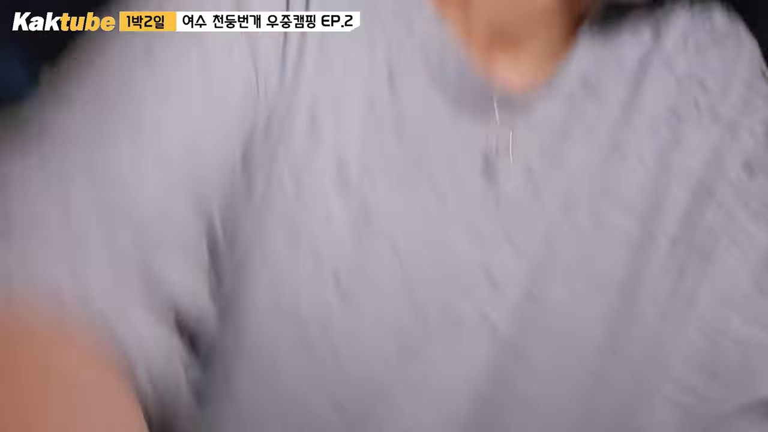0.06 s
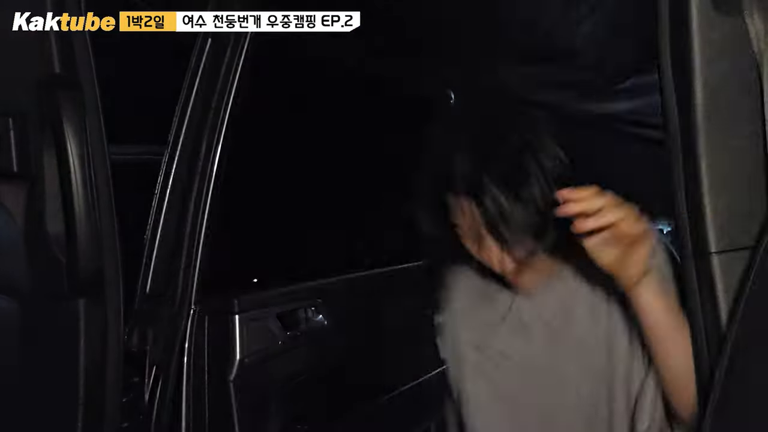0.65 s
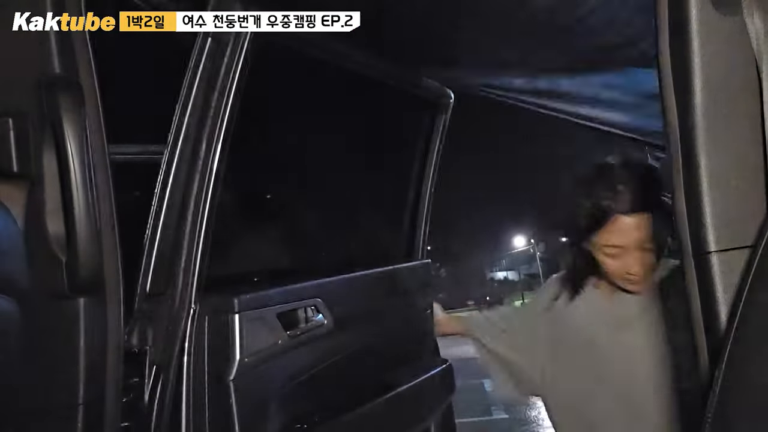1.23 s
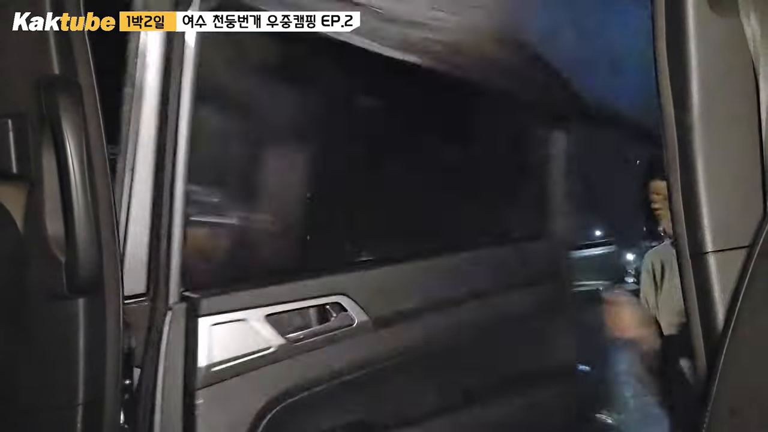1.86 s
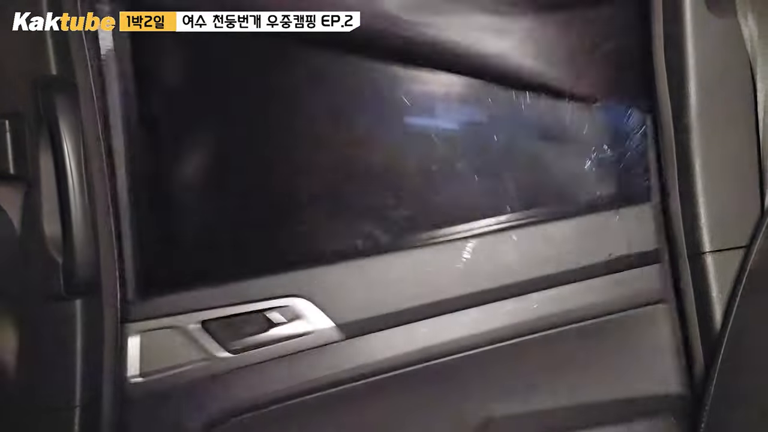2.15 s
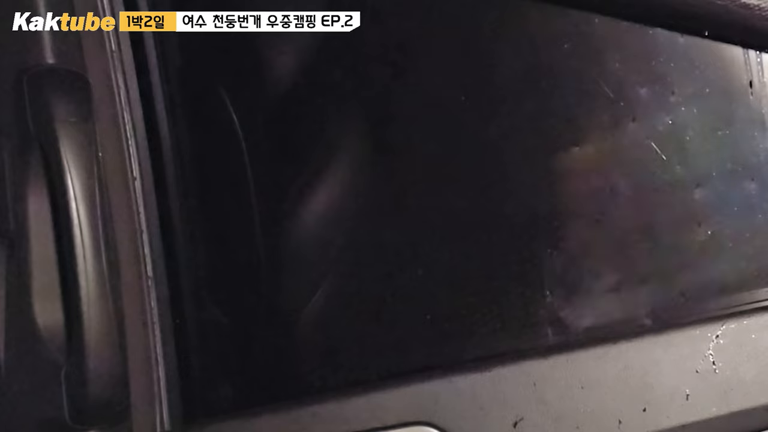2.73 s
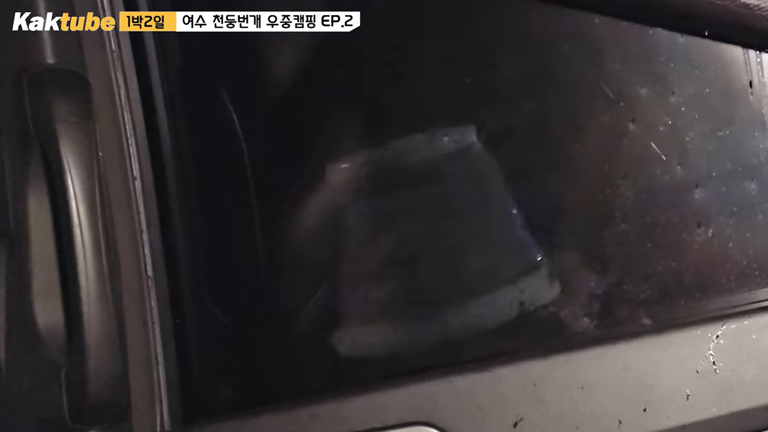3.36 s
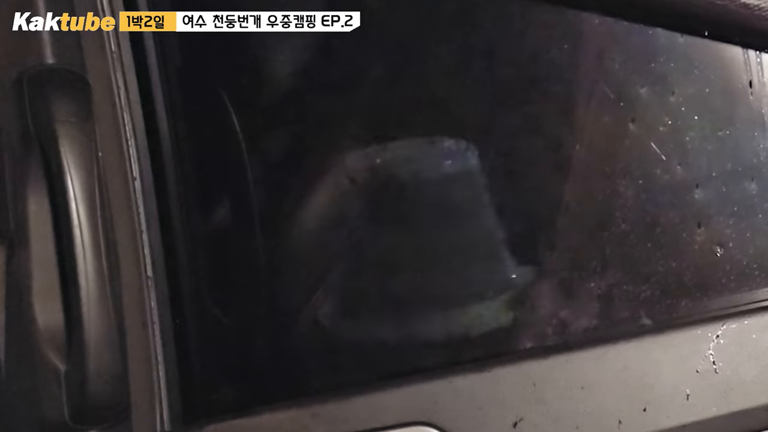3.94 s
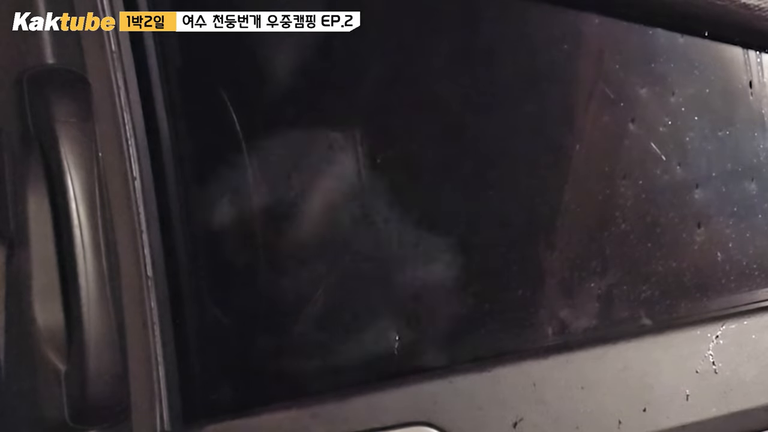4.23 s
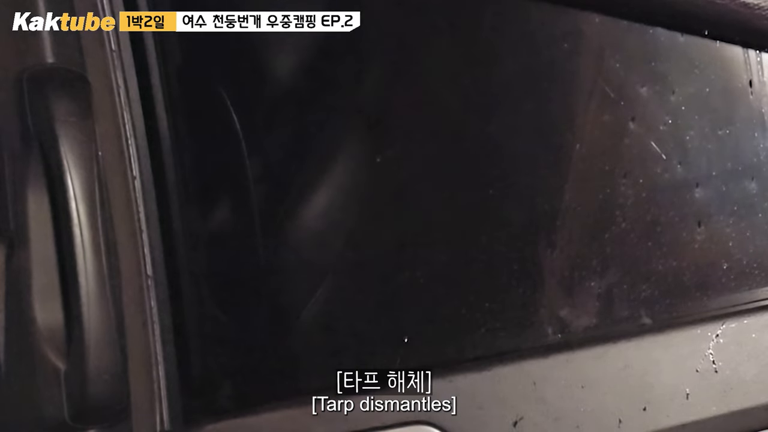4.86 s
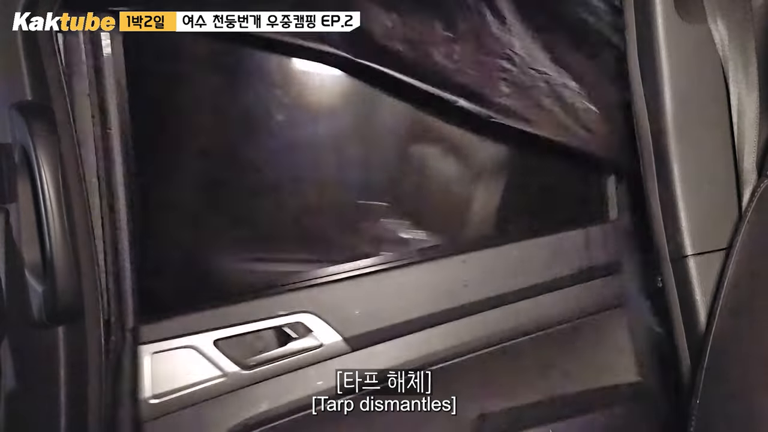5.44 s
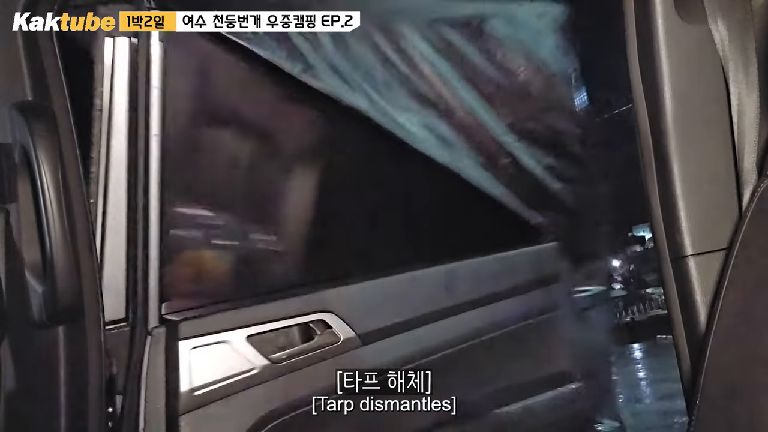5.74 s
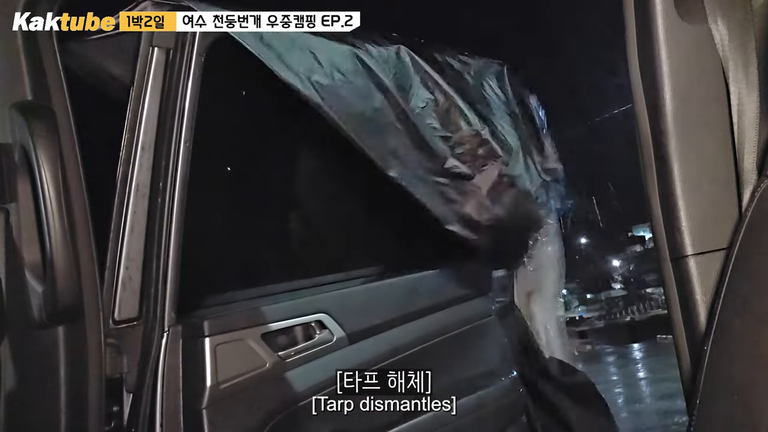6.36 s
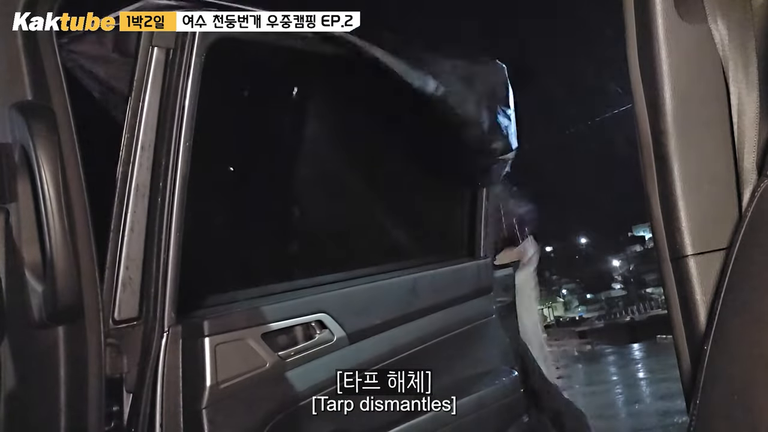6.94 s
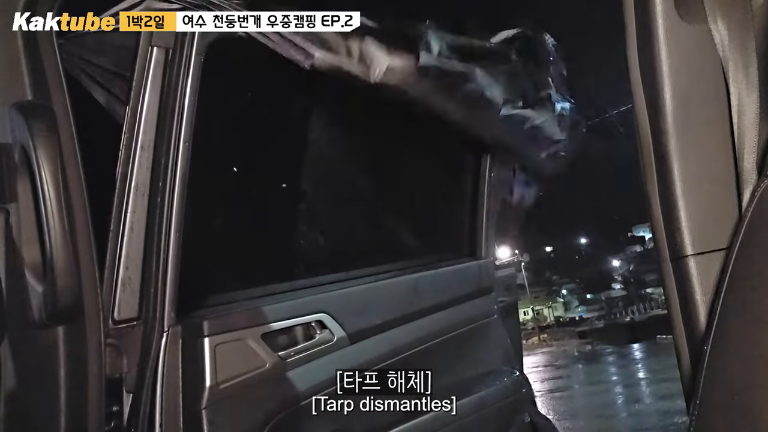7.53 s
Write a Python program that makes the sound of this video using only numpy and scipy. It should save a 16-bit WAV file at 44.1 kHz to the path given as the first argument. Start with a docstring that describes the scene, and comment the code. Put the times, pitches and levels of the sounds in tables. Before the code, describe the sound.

Heard from a car's back seat, rain patters on a tarp by the open door and drums dully on the roof. A hand knocks against the microphone, and fat drips fall nearby. The door slams with a deep boom and the rain turns muffled. Something thuds against the car, then the door clunks open and the wet tarp is dragged off, swishing, crumpling and snapping over faint rain.

```python
"""Night rain patters on a tarp by a parked car's open door and drums on the roof, heard from the back
seat. A hand knocks the camera into place, ringing its mount. The door slams: panel and latch ring, the
cabin air booms and the rain turns dull. Something thuds against the car. The door is unlatched again
and the wet tarp is dragged off it, swishing, crumpling and snapping at its folds."""
import sys
import numpy as np
from scipy import signal
from scipy.fft import rfft, irfft, next_fast_len
from scipy.io import wavfile
from scipy.ndimage import map_coordinates

SR = 44100
rng = np.random.default_rng(int(sys.argv[2]) if len(sys.argv) > 2 else 0)


def transcribe(u):
    """Save the signal u as a 16-bit wav file named by the first command-line argument.

    u: samples, shape (n,) or (channels, n), limited to [-1, 1]; the rate is SR.
    q: integer samples, one column per channel.
    """
    v = np.clip(np.atleast_2d(u).T, -1, 1)
    q = np.round(v * 32767).astype(np.int16)
    wavfile.write(sys.argv[1], SR, q)


N = 334719

# rain at the back seat before the slam (time [s], level [dB])
RAIN_FADER = [(0, -37.5), (.3, -38.5), (.46, -48.5), (.6, -34), (.78, -32), (1.45, -37), (1.8, -36),
              (2.2, -40)]
# roof drumming and body rumble (time [s], roof level [dB], rumble level [dB])
BODY_FADERS = [(0, -33.5, -38.5), (.6, -38, -42), (1.1, -44.5, -41), (1.39, -38, -33), (1.58, -50.5, -48),
               (2.2, -39.5, -38), (2.85, -46.5, -48), (3.6, -54, -46), (4.42, -50.5, -39.5),
               (5.45, -52, -48), (6.25, -44.5, -49.5), (7.59, -51.5, -54.5)]
# the car rocking as someone moves about it (time [s], level [dB], pitch [Hz], t60 [s])
ROCKING = [(0.16, -19.5, 64, 0.26), (.27, -18, 73.5, 0.48), (0.824, -13.5, 46.8, 0.21),
           (1.429, -25, 43, 0.65), (2.149, -14.5, 63.3, 0.13), (3.104, -29, 57.3, 1),
           (4.791, -23.5, 42.7, .3), (5.015, -23, 63, 0.77), (5.696, -28.5, 57.4, 0.44),
           (6.28, -28, 40.8, 0.36)]
# knocks on the camera (time [s], ring level [dB], click level [dB], click tilt [dB/octave])
CAMERA_KNOCKS = [(.162, -5, -17.5, 3), (0.2525, -15.5, -12.5, -1), (.298, -16.5, -20.5, -4),
                 (.319, -3.5, -12, 1.5), (0.3291, -6.5, -6.5, -2), (.353, -13, -25, -6),
                 (.386, -14.5, -25, -7.5), (0.4366, -17.5, -15, -0.5), (0.483, -20, -31, 0),
                 (0.54, -36, -24.5, 2.5)]
# grip and rubber seals rubbing (start [s], end [s], final level [dB], pitch [Hz])
RUBBER_RUBS = [(0.209, 0.252, -34.5, 600), (0.266, 0.331, -25.5, 526), (2.194, 2.223, -26.5, 596),
               (3.241, 3.318, -43.5, 495), (4.949, 5.09, -40, 314)]
# small hard things clinking (time [s], level [dB], pitch [Hz], t60 [s])
HARD_CLINKS = [(0.4378, -13.5, 3080, 0.0087), (4.489, -59, 1640, 0.2), (4.49, -47, 2270, 0.061)]
# door hits (time [s], panel [dB], trim [dB], latch [dB], crack t60 [s], crack tilt [dB/octave])
DOOR_HITS = [(2.169, -28, -52, -34, 0.039, -0.5), (2.2166, -10, -41, -19, 0.032, -1),
             (2.22, -20, -43, -6, 0.056, -3), (2.241, -28.5, -22, -20.5, 0.085, 5),
             (2.257, -34.5, -30.5, -18.5, 0.075, 3.5), (2.281, -36, -27, -37.5, 0.35, 4.5),
             (3.309, -10, -13.5, -45, 0.24, -1.5), (3.341, -11, -29, -36, 0.11, -2.5),
             (3.966, -30, -35, -62, .09, -8), (4.958, -38.5, -42, -39.5, 0.0087, 0.5),
             (5.0696, 0.5, -28, -34.5, 0.13, -4), (5.106, -21, -24, -36, .06, -5)]
# jolts that pump the cabin air (time [s], level [dB], pitch [Hz], bodywork shudder [dB])
JOLTS = [(2.29, 3, 67.6, -31.5), (2.455, -1.5, 40.2, -43.5), (3.317, 4.5, 53.5, -34.5),
         (5.067, -0.5, 74, -27)]
# pulls on the tarp (middle [s], length [s], swish level [dB], crumple level [dB])
TARP_PULLS = [(5.6, 0.45, -50, -52), (5.995, 0.14, -55, -49.5), (6.249, 0.13, -47.5, -44),
              (6.459, 0.099, -43.5, -41), (6.59, .055, -47, -38), (6.635, 0.046, -45, -50),
              (6.864, 0.1, -53.5, -50), (7.153, 0.13, -46.5, -44.5), (7.33, .09, -69, -45.5),
              (7.53, 0.18, -68, -44.5)]

# one-shots (time [s], level [dB], pitch [Hz])
TARP_DRIPS = [(.599, -29, 1390), (.641, -16, 1200), (.962, -24, 1400), (1.063, -16, 1230),
              (1.104, -23, 1626), (1.144, -16.5, 3460), (1.574, -26, 1330), (2.025, -33.5, 1390)]  # fat drips near the door
CAR_BRUSH = [(4.485, -39, 2190)]  # something brushes the outside of the car
FOLD_SNAPS = [(5.548, -35, 2560), (5.872, -24.5, 3610), (5.986, -23, 1730), (6.218, -18, 2260),
              (6.261, -26.5, 3060), (6.455, -23, 1490), (6.559, -26, 1043), (6.671, -22, 1120),
              (6.712, -22, 4200), (6.896, -25, 1175), (6.978, -27.5, 1586), (7.297, -24, 1204),
              (7.466, -27, 2550), (7.497, -27, 1340), (7.551, -28.5, 2100)]  # tarp folds flipping over

# ringing modes (pitch [Hz], level [dB], t60 [s])
MOUNT_MODES = [(209, 1.5, 0.032), (245.6, 1.5, 0.057), (319, -3, 0.026), (636, -18, 0.024)]
PANEL_MODES = [(124, -6.5, 0.097), (185, 0, 0.028), (235.5, -4.5, 0.092), (269, -21.5, .13),
               (464, -24.5, 0.086), (626, -34, 0.1)]
LATCH_MODES = [(649, -7.5, 0.083), (796, 0, 0.056), (1110, -2, .05), (1370, -3.5, 0.076),
               (1576, -13, 0.029), (2000, -8, 0.046), (3030, -10, 0.033), (4330, -9, 0.04),
               (7670, -19, .04)]
BOOM_MODES = [(75.8, -6, 0.37), (39.47, -16.5, 1.63), (60, -17, 0.89), (31.26, -19.5, 3.3)]  # cabin air after the slam, beating in pairs

# tone colours (frequency [Hz], level [dB])
PATTER_EQ = [(150, -2.5), (250, -2), (480, -2), (650, -8), (1350, -3), (2200, -7.5), (4000, -7.5),
             (8000, -13.5), (16000, -15)]
SHUT_DOOR_EQ = [(300, -3.5), (900, 6.5), (1600, 1.5), (3800, 0.5), (6000, -6.5), (16000, -23)]  # rain leaking into the closed car
ROOF_EQ = [(90, -0.5), (125, -0.5), (180, -10), (290, -4), (420, -8), (620, -15.5), (850, -13), (1500, -27),
           (4000, -55.5)]
RUMBLE_EQ = [(12, -16), (22, 7), (45, 4.5), (75, -1.5), (115, -7), (170, -36), (400, -54)]
PLASTIC_CLICK_EQ = [(120, -31), (330, 0.5), (600, -1), (1100, -9), (2000, -13.5), (4000, -15.5),
                    (8000, -25.5), (16000, -32.5)]
LATCH_CRACK_EQ = [(300, -33), (650, -14), (1500, -4.5), (3000, -8.5), (5000, -15), (10000, -21.5),
                  (16000, -23.5)]
SWISH_EQ = [(1300, -18), (2400, -12.5), (3400, -10), (6000, -11), (10000, -13.5), (16000, -12.5)]
CRUMPLE_EQ = [(60, 0.5), (105, 7), (170, 0), (260, -2), (500, 0.5), (700, -10.5), (1200, -2.5),
              (2000, -10.5), (3200, -6.5), (7000, -18)]
MICROPHONE_EQ = [(2000, 1.5), (2600, -0.5), (3100, 1.5), (6800, -0.5), (7350, 2), (7900, 1.5), (10700, -3),
                 (11600, 4), (12700, -3.5)]

# stereo image (frequency [Hz], left-right correlation [-1..1])
STEREO_LIKENESS = [(40, 0.94), (290, 1), (640, 0.33), (1400, 0.12), (3000, -0.097), (15000, 0.012)]
# cabin reverb (frequency [Hz], t60 [s])
CABIN_DECAY = [(100, 0.27), (1000, 0.047), (10000, 0.035)]

SHUT_S, HUSH_S, OPEN_S = 2.22, 2.668, 5.07  # cues: door slams, boom and hiss cut off, door reopens
AIR_ATTACK_S = 0.0055
TOP_HZ = 15950


def amp(db):
    """Decibels to gain."""
    return 10 ** (np.asarray(db) / 20)


def unit(x):
    """Scale to rms 1."""
    return x / np.sqrt(np.mean(x ** 2) + 1e-20)


def along(points, hz):
    """Read a (frequency, value) curve on a log axis."""
    freqs, values = np.transpose(points)
    return np.interp(np.log(hz + 1), np.log(freqs + 1), values)


def tilted(eq, tilt):
    """An EQ curve with its treble tilted, in dB per octave."""
    return lambda hz: amp(along(eq, hz) + tilt * np.log2(1 + hz / 1000))


def faders(rows):
    """One value per sample for each column after the time."""
    times, *columns = np.transpose(rows)
    return [np.interp(np.arange(N) / SR, times, column) for column in columns]


def wobble(rate):
    """A smooth random curve, rate knots a second."""
    return map_coordinates(rng.standard_normal(2048), [np.arange(N) * rate / SR], mode="wrap")


def filtered(x, response):
    """Filter x by a complex frequency response."""
    n = x.shape[-1]
    padded = next_fast_len(n + 8192)
    return irfft(rfft(x, padded) * response(np.fft.rfftfreq(padded, 1 / SR)), padded)[..., :n]


def resonance(f, hz, width):
    """Causal response of one mode."""
    return 1j * f * width / (hz * hz - f * f + 1j * f * width)


def add(track, s, sound):
    """Mix a sound in at time s."""
    part = track[..., max(round(s * SR), 0):][..., :sound.shape[-1]]
    part += sound[..., :part.shape[-1]]


def spread(pair, colour):
    """Colour two unrelated signals into stereo at rms 1: bass centred, treble wide."""
    angle = lambda hz: np.arccos(np.clip(along(STEREO_LIKENESS, hz), -.99, .99)) / 2
    mid, side = filtered(pair, lambda hz: colour(hz) * np.array([np.cos(angle(hz)), np.sin(angle(hz))]))
    return unit(np.array([mid + side, mid - side]))


def shaped(pair, eq):
    """A stereo pair coloured by an EQ table."""
    return spread(pair, lambda hz: amp(along(eq, hz)))


def noise(size=N):
    """Two unrelated white noises."""
    return rng.standard_normal((2, size))


def burst(colour, t60):
    """Coloured stereo noise that starts at once and dies away."""
    t = np.arange(SR // 3) / SR
    return spread(noise(len(t)), colour) * amp(-60 * t / t60)


def ring(modes, attack):
    """Modes struck once, each at a slightly random strength, in alternating polarity."""
    t = np.arange(SR // 2) / SR
    swing = sum((-1) ** k * amp(db + rng.normal() / 2 - 60 * t / t60) * np.sin(2 * np.pi * hz * t)
                for k, (hz, db, t60) in enumerate(modes))
    return swing * (1 - np.exp(-t / attack))


def drop_gain(size, spread_db):
    """Turn uniform draws into hit gains: most alike, a few far off."""
    return amp(spread_db * np.minimum(-np.log(1 - size), 4))


def grains(count, cycles, spread_db, low_hz=200, high_hz=TOP_HZ):
    """Tiny damped rings of random pitch, size and pan; flat on average within their band."""
    when, pitch, size, lag, pan = rng.random((count, 5)).T
    hz = (np.sqrt(low_hz) + pitch * (np.sqrt(high_hz) - np.sqrt(low_hz))) ** 2
    gain = drop_gain(size, spread_db) * hz ** (3 / 4)
    k = np.arange(256)
    phase = hz[:, None] * k / SR
    waves = gain[:, None] * np.sin(2 * np.pi * phase) * np.exp(-phase / cycles) * (1 - k / len(k))
    channels = []
    for delay, pan_gain in (10, np.sin(np.pi * pan)), (20 * lag, np.cos(np.pi * pan)):
        samples = (when * N + delay).astype(int)[:, None] + k
        channels.append(np.bincount(samples.ravel(), (waves * pan_gain[:, None]).ravel(), N)[:N])
    return unit(np.array(channels))


def splats(count, life, spread_db):
    """Broadband splashes of random size, each fading over about life seconds."""
    when, size = rng.random((count, 2)).T
    hits = np.bincount((when * N).astype(int), drop_gain(size, spread_db) ** 2, N)
    energy = signal.lfilter([1], [1, -np.exp(-2 / (life * SR))], hits)
    return unit(noise() * np.sqrt(energy))


def rain():
    """Fine drops and splats on the tarp over a far wash; the shut door lets only a dull bed through."""
    t = np.arange(N) / SR
    spray = grains(count=12000, cycles=3.5, spread_db=2.5)
    spray += amp(3.5) * (splats(count=1300, life=0.0062, spread_db=3.5) + noise())
    # bigger drops ring the taut cloth for a few cycles
    plops = grains(count=600, cycles=3, spread_db=3.3, low_hz=950, high_hz=2100)
    outside = shaped(spray, PATTER_EQ) + amp(-8.5) * plops
    muffled = shaped(noise() + amp(-1) * splats(count=1000, life=.005, spread_db=-1), SHUT_DOOR_EQ)
    shut = np.clip((t - SHUT_S) / .03, 0, 1) * np.clip((OPEN_S - t) / 0.027, 0, 1)
    opening_db, = faders(RAIN_FADER)
    reopened_db = -59.5 + 4 * (t - OPEN_S)  # grows as the tarp comes away
    open_db = np.where(t < HUSH_S, opening_db, reopened_db)
    settling_db = 22.5 * np.exp(-np.abs(t - SHUT_S) / 0.31)  # loud at the slam, then sinking
    shut_db = -61 + settling_db + 0.38 * wobble(7.8)
    hiss = amp(-53.5) * (t < HUSH_S) * shaped(noise(), SWISH_EQ)  # bright tail after the slam
    return shut * (amp(shut_db) * muffled + hiss) + (1 - shut) * amp(open_db) * outside


def car_body():
    """Rain drums dully on the roof while the car body rumbles."""
    roof_db, rumble_db = faders(BODY_FADERS)
    roof = amp(roof_db + .5) * shaped(splats(count=2500, life=0.016, spread_db=4.0), ROOF_EQ)
    rumble = amp(rumble_db + 1.5 + 1.9 * wobble(22)) * shaped(noise(), RUMBLE_EQ)
    return roof + rumble


def cabin_reverb(x):
    """The short, padded answer of the car's interior."""
    hz, t, spectrum = signal.stft(noise(SR // 3), SR, nperseg=256)
    decay = amp(-60 * t / along(CABIN_DECAY, hz)[:, None])
    tail = signal.istft(spectrum * decay, SR, nperseg=256)[1]
    tail = filtered(tail / np.linalg.norm(tail[0]), lambda f: f / (f + 150))  # low cut
    predelayed = np.pad(x, ((0, 0), (SR // 300, 0)))
    return signal.fftconvolve(predelayed, tail, axes=1)[:, :N]


def cabin_air():
    """The low end: the air swings as the car rocks, on top of the slam's boom and the jolts."""
    out = slam_boom() + jolts()
    for s, db, hz, t60 in ROCKING:
        add(out, s, amp(db) * ring([(hz, 0, t60)], AIR_ATTACK_S))
    buffet = 0.31 * wobble(30)  # moving air presses on each microphone port differently
    return out * np.array([1 + buffet, 1 - buffet])


def camera_knocks():
    """Each knock rings the mount under a short plastic click with its own brightness."""
    out = np.zeros((2, N))
    for s, ring_db, click_db, tilt in CAMERA_KNOCKS:
        add(out, s, amp(ring_db) * ring(MOUNT_MODES, attack=0.0014))
        add(out, s, amp(click_db - 2.5) * burst(tilted(PLASTIC_CLICK_EQ, tilt), t60=0.036))
    return out


def rubs_and_clinks():
    """Hard bits clink; soft surfaces stick and slip ever harder until they give."""
    out = np.zeros((2, N))
    for s, db, hz, t60 in HARD_CLINKS:
        add(out, s, amp(db) * ring([(hz, 0, t60)], attack=0.00017))
    for start, end, db, hz in RUBBER_RUBS:
        push = np.linspace(0, 1, max(round((end - start) * SR), 2))
        slips = spread(noise(len(push)), lambda f: resonance(f, hz, 0.34 * hz) / (1 + f / 3000))
        add(out, start, amp(db) * push * slips)
    return out


def snaps(rows, t60):
    """A drip, brush or cloth snap: a sharp front and a noise tail in one broad resonance."""
    out = np.zeros((2, N))
    for s, db, hz in rows:
        colour = lambda f: resonance(f, hz, hz)
        tail = burst(colour, t60)
        front = amp(-4.5) * burst(colour, t60=0.011)
        add(out, s, amp(db - 8.0) * (front + tail))
    return out


def door_hits():
    """Blows ring the door panel, thud in its trim and rattle the steel latch."""
    out = np.zeros((2, N))
    soft_attack = 1 - np.exp(-np.arange(SR // 3) / SR / .004)  # the trim takes the blow gradually
    for s, panel_db, trim_db, latch_db, t60, tilt in DOOR_HITS:
        add(out, s, amp(panel_db) * ring(PANEL_MODES, attack=0.0016))
        thud = burst(lambda f: resonance(f, 460, 340) ** 4, t60=0.063)
        add(out, s, amp(trim_db) * thud * soft_attack)
        crack = burst(tilted(LATCH_CRACK_EQ, tilt), t60)
        add(out, s, amp(latch_db - 0.5) * crack)
        steel = amp(latch_db - 6.0) * ring(LATCH_MODES, attack=.0008)
        add(out[0], s, amp(-0.5) * steel)
        add(out[1], s + .0003, amp(-1.5) * steel)  # the far port hears the latch later and weaker
    return out


def slam_boom():
    """The slam sets the cabin air booming and the bodywork shaking unevenly; both cut off at HUSH_S."""
    out = np.zeros((2, N))
    onset = SHUT_S + 0.0146  # just after the latch shuts
    add(out, onset, ring(BOOM_MODES, AIR_ATTACK_S))
    t = np.arange(SR) / SR
    shake_hz, shake_t60 = 95, 1
    shake = spread(noise(SR), lambda f: resonance(f, shake_hz, 0.44 * shake_hz) ** 3)
    envelope = amp(-22 - 60 * t / shake_t60) * (1 - np.exp(-t / AIR_ATTACK_S))
    add(out, onset, envelope * shake)
    return out * np.clip((HUSH_S - np.arange(N) / SR) / .01, 0, 1)


def jolts():
    """Each jolt gives the air one hard push and a weak long swing, and the bodywork shudders."""
    out = np.zeros((2, N))
    for s, db, hz, shudder_db in JOLTS:
        add(out, s, amp(db) * ring([(hz, 0, 0.054)], AIR_ATTACK_S))
        add(out, s, amp(db - 13) * ring([(hz, 0, 0.35)], attack=0.024))
        add(out, s, amp(shudder_db) * burst(lambda f: amp(along(ROOF_EQ, f)), t60=0.35))
    return out


def tarp_drag():
    """Pulled over the door, the coated cloth swishes, crumples in clumps and snaps at its folds."""
    t = np.arange(N) / SR
    swish_power, crumple_power = amp(-58) ** 2, amp(-56) ** 2  # slack cloth between pulls
    for middle, length, swish_db, crumple_db in TARP_PULLS:
        swell = np.exp(-(2 * (t - middle) / length) ** 2)
        swish_power += amp(swish_db) ** 2 * swell
        crumple_power += amp(crumple_db) ** 2 * swell
    swish = shaped(grains(count=6000, cycles=1.2, spread_db=9.5) + amp(14) * noise(), SWISH_EQ)
    creases = grains(count=2000, cycles=2.0, spread_db=4.5, low_hz=840, high_hz=2330)
    crumple = shaped(splats(count=1800, life=0.012, spread_db=2.5), CRUMPLE_EQ) + amp(-8) * creases
    flutter = amp(2.5 + 0.95 * wobble(35))
    cloth = flutter * np.sqrt(swish_power) * swish + np.sqrt(crumple_power) * crumple
    return (t > OPEN_S) * cloth + snaps(FOLD_SNAPS, t60=.048)


def scene():
    """The back-seat mix: close sounds feed the cabin reverb, over a dry bed of roof and rumble."""
    near = camera_knocks() + rubs_and_clinks() + snaps(CAR_BRUSH, t60=0.3)
    near += door_hits() + cabin_air() + tarp_drag()
    near += (rain() + snaps(TARP_DRIPS, t60=.033)) * amp([[.6], [-.6]])  # leaning left
    return near + amp(-9.5) * cabin_reverb(near) + car_body()


def record(dry):
    """The camera's ports colour the treble; it soft-clips the peaks and cuts all above TOP_HZ."""
    coloured = filtered(dry, lambda hz: amp(along(MICROPHONE_EQ, hz)))
    rounded = coloured / (1 + np.abs(coloured) ** 8) ** (1 / 8)
    return filtered(rounded, lambda hz: hz < TOP_HZ)


dry = scene()
out = record(dry)
transcribe(out)
```